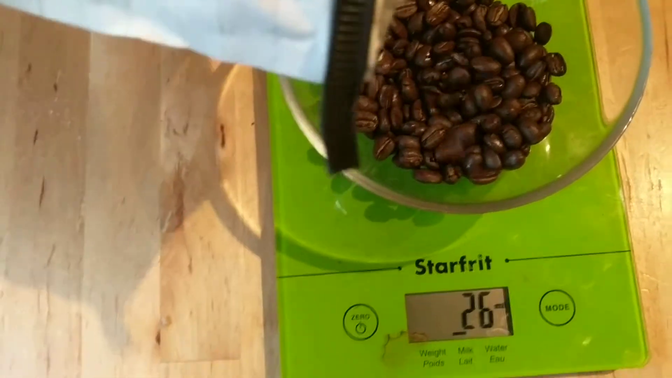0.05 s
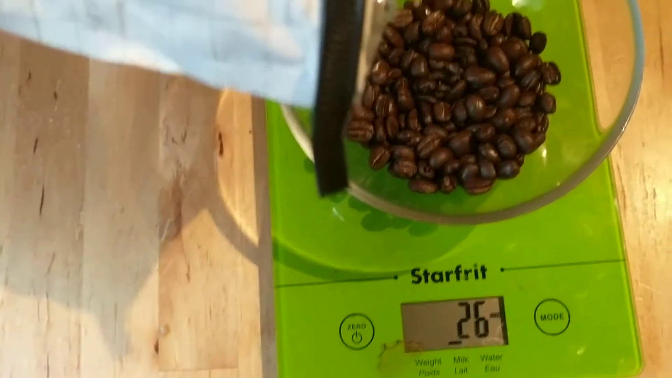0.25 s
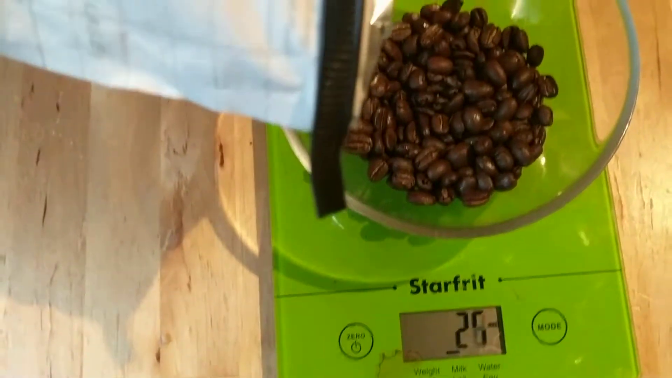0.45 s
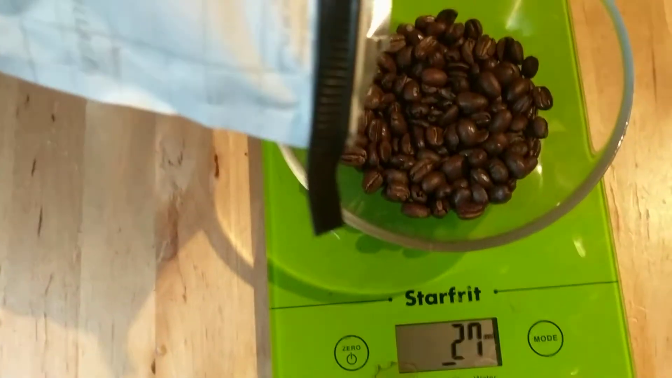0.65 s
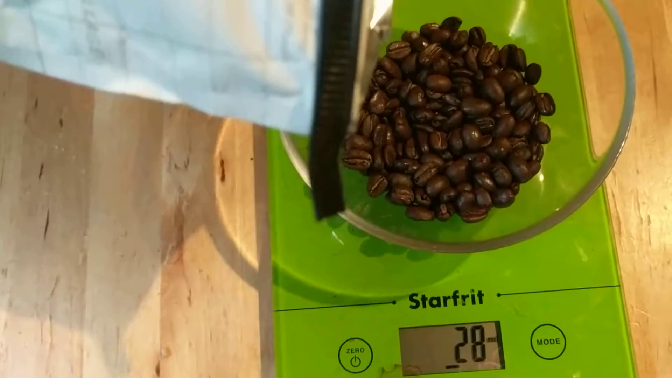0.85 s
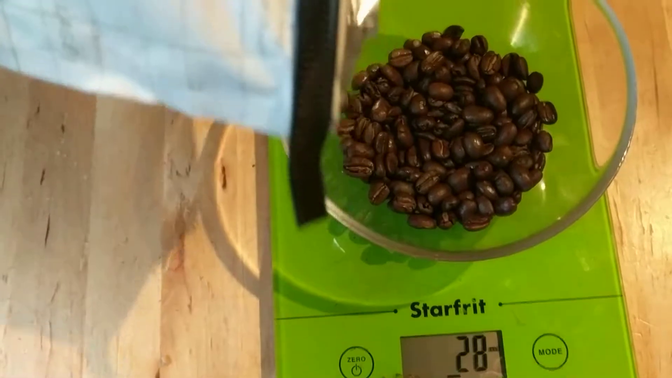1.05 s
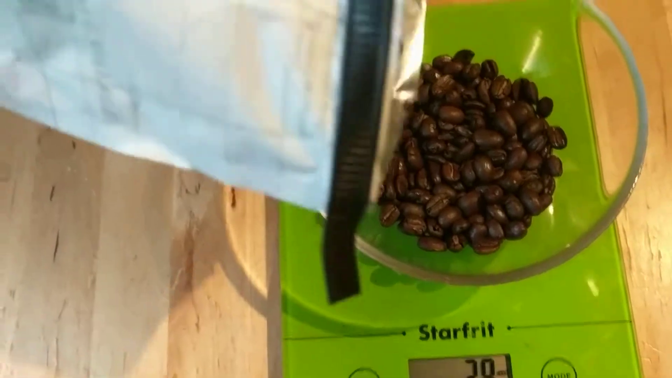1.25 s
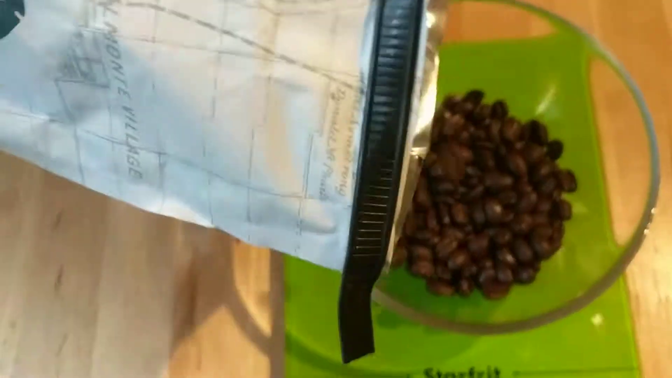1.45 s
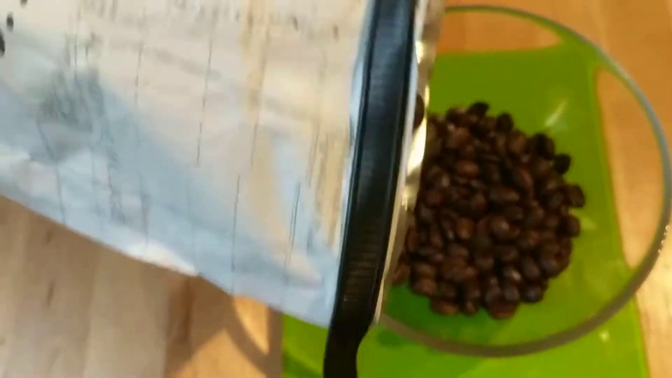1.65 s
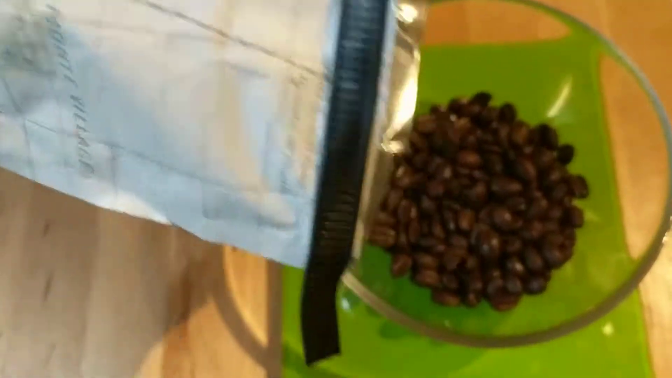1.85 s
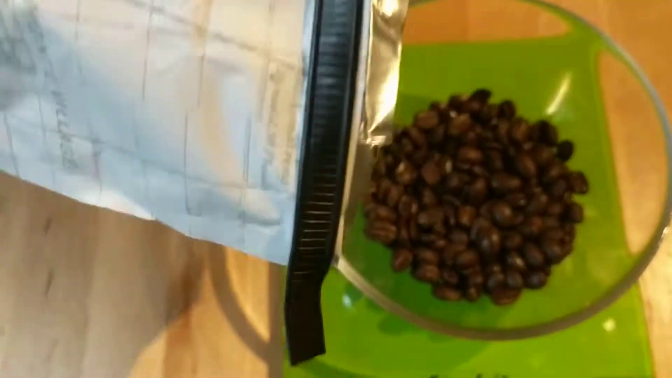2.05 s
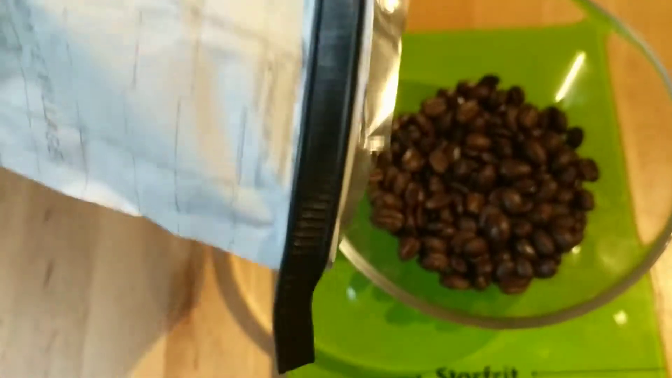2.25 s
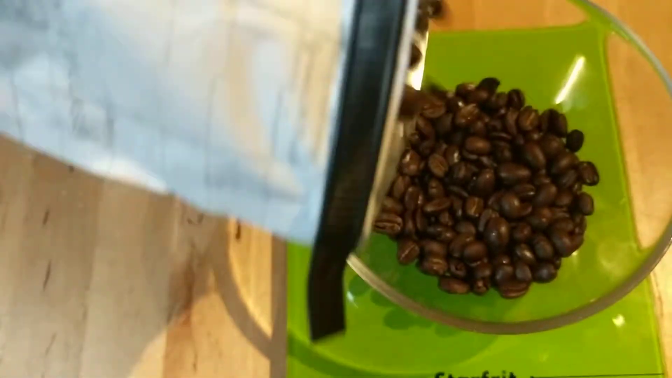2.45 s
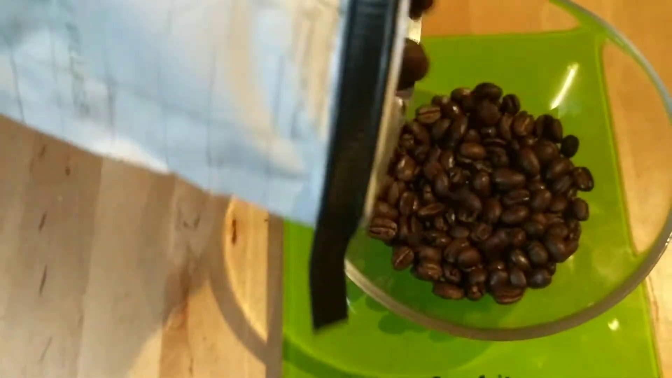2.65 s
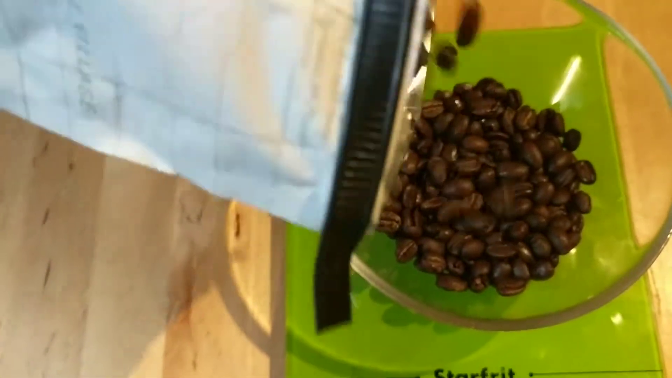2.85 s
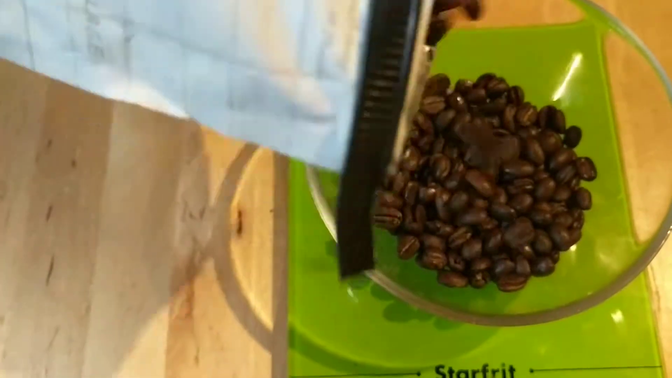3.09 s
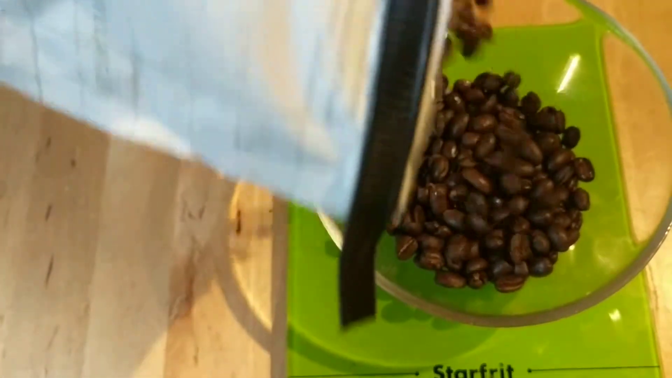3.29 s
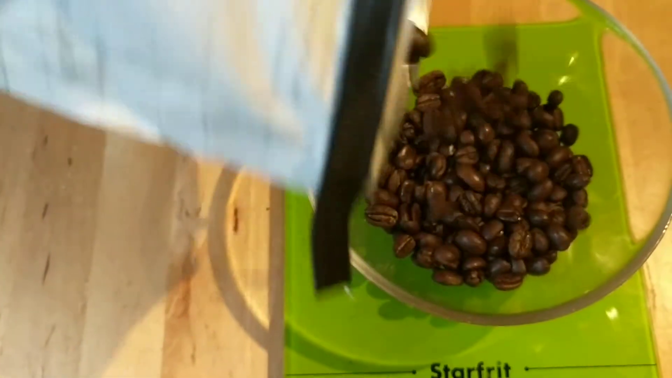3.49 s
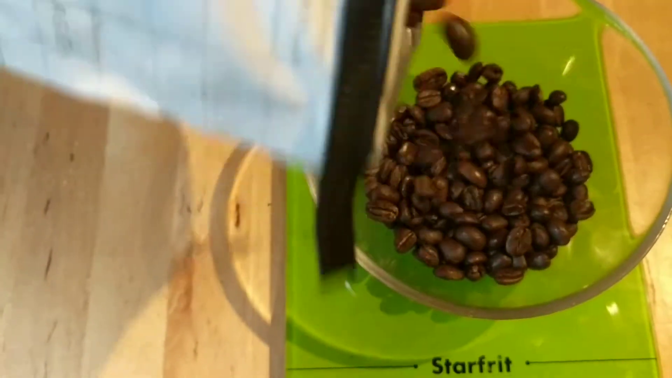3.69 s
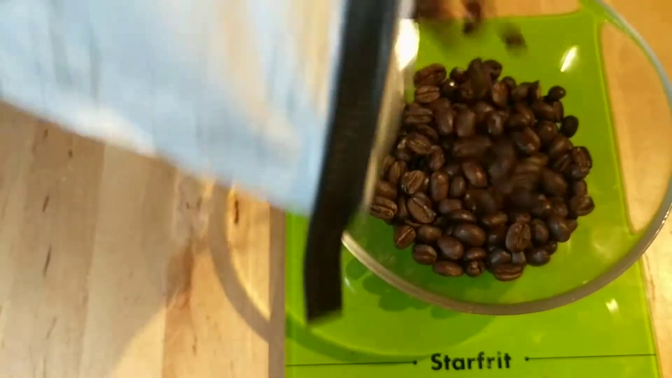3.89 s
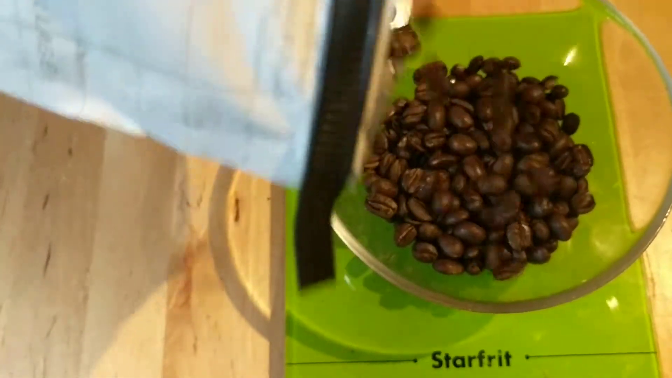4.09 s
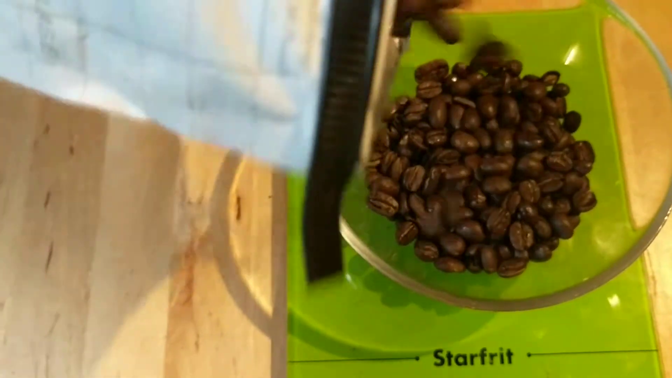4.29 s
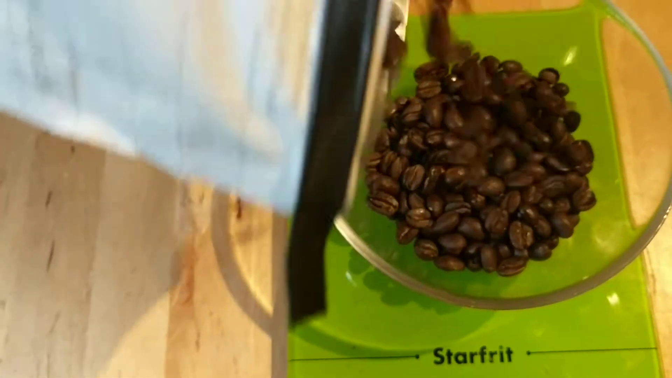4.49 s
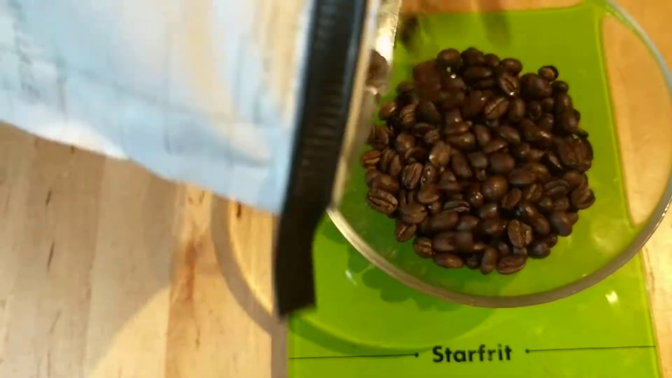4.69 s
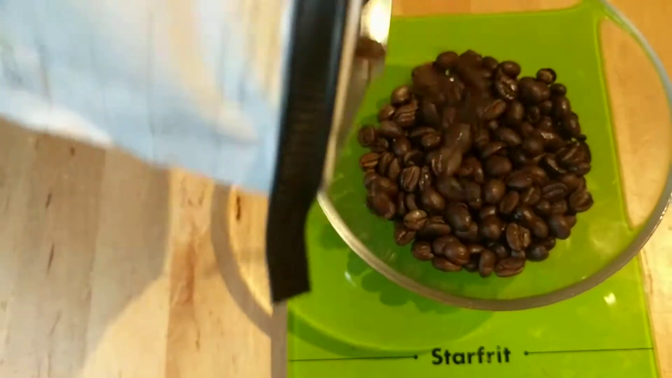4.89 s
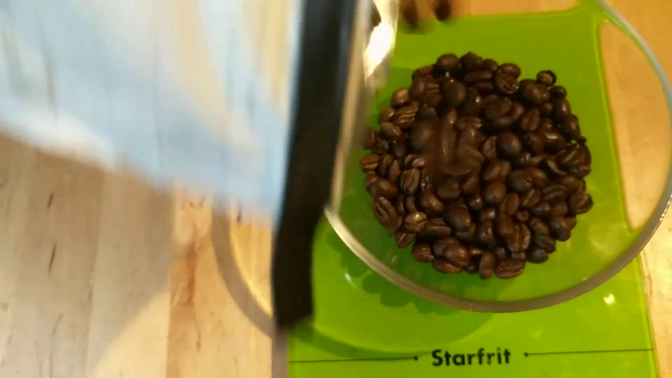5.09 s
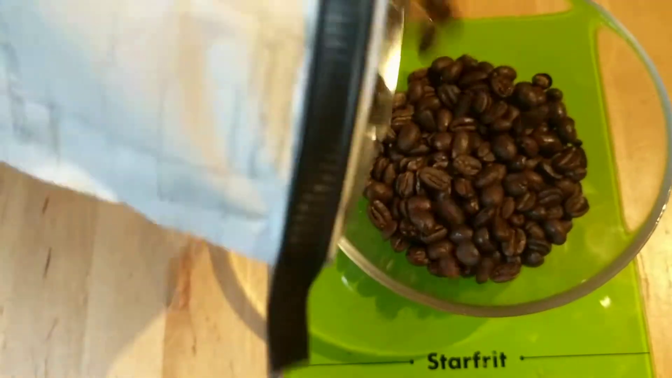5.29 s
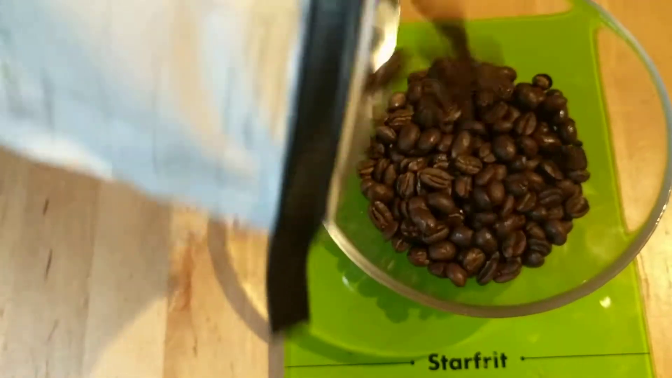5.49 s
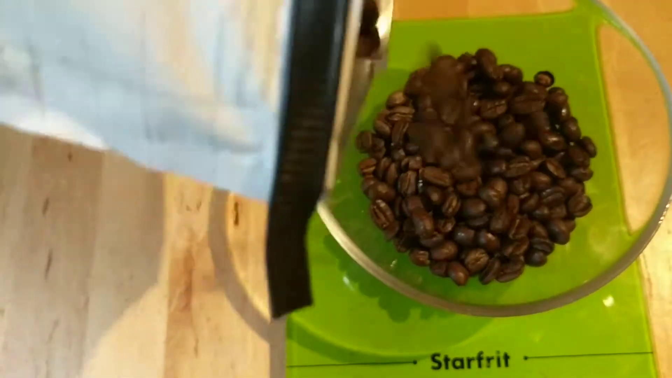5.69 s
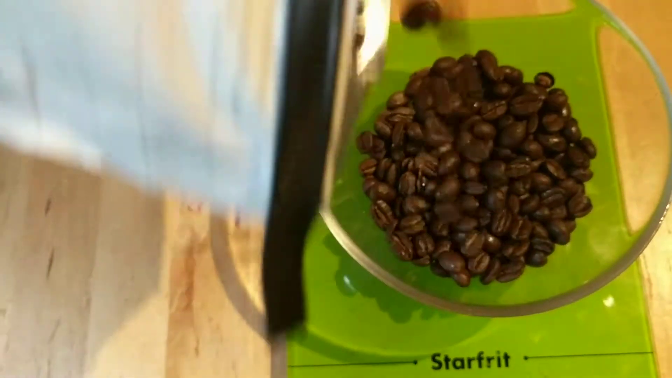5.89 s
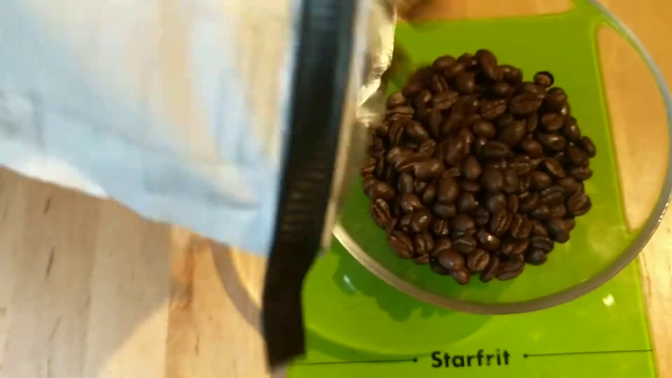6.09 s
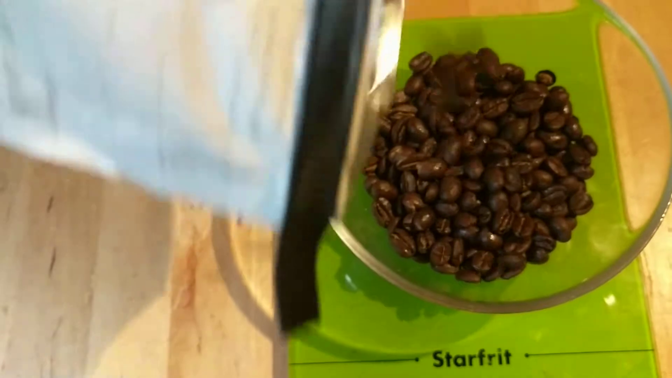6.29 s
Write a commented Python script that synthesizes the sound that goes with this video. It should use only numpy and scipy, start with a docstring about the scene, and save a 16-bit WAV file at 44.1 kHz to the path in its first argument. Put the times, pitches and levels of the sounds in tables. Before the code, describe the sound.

A close, dry view of coffee beans shaken from a foil-lined bag onto a heap in a glass bowl, in a quiet kitchen with faint air, low wavering hum and a barely audible high pulsing whine. In the first 0.3 s a few beans click down with a small bag rattle. Then it is nearly still until about 1.4 s, when beans creep and slide in the bag; scattered clicks and papery knocks come from 1.5 to 2 s. The dull rattle swells around 2.3 s, and from 2.6 s the pour sets in, full by 3.4 s: sharp bright clicks with hollow knocks, tiny rebounds, and surges of pattering clumps over hollow bag rustling. Faint glass pings occur near 0.1, 3.6, 4.1 and 6.3 s, and a soft low bump at 4.8 s. The uneven pouring continues to the end, about 6.3 s.

```python
"""Roasted coffee beans are shaken out of a foil-lined bag onto a heap in a glass bowl, close by.
Random contacts of sliding beans excite the folds and cavity of the bag: a dull papery rattle.
Each falling bean is a pair of filtered impulses, a brittle click and a hollow knock, and the heap patters.
Damped sines ring the bare glass and make one soft bump; room reflections follow all the beans.
Filtered noise gives the kitchen's air and low hum, and pulsed sines a faint electronic whine."""
import sys
import numpy as np
from scipy import signal
from scipy.fft import rfft, irfft
from scipy.io import wavfile

SR = 44100
rng = np.random.default_rng(int(sys.argv[2]) if len(sys.argv) > 2 else 0)


def to_wav(sig):
    """Store sig (one row per channel, or 1-D mono) as 16-bit WAV at the path in sys.argv[1].

    Samples outside -1..1 are clipped; the rate is SR.
    """
    pcm = np.clip(np.atleast_2d(sig), -1, 1) * 32767
    pcm = np.round(pcm).astype(np.int16)
    wavfile.write(sys.argv[1], SR, pcm.T)  # frames by channels


N = 279584
T = np.arange(N) / SR
POUR_S, POUR_BUILD_S = 2.62, 0.76  # start of the steady pour and the time it takes to build up


def undb(db):
    """Level definition: converts decibels to amplitude gain."""
    return 10 ** (np.asarray(db) / 20)


def unit(x):
    """Normalisation by mean power: scales to rms 1."""
    return x / np.sqrt(np.mean(x ** 2))


def follow(curve):
    """Amplitude envelope: the gain along a (t/s, level/dB) curve, interpolated in decibels."""
    return undb(np.interp(T, *np.transpose(curve)))


def add(out, s, sound):
    """Linear superposition: mixes a sound in at time s."""
    i = int(np.clip(s * SR, 0, N))
    out[i:i + len(sound)] += sound[:N - i]


def response(colour, size=1024):
    """Minimum phase: folding the cepstrum gives a causal impulse response with a (f/Hz, level/dB) spectrum."""
    hz, db = np.transpose(colour)
    bins = np.maximum(np.arange(size // 2 + 1) * SR / size, 1)
    log_gain = np.log(undb(np.interp(np.log(bins), np.log(hz), db)))
    cepstrum = irfft(log_gain)
    cepstrum[1:size // 2] *= 2
    cepstrum[size // 2 + 1:] = 0
    return irfft(np.exp(rfft(cepstrum)))


def through(x, ir):
    """Convolution: the output of a linear system with this impulse response."""
    return signal.oaconvolve(x, ir)[:len(x)]


def resonate(x, hz, width_hz):
    """Simple resonance: one second-order mode with gain 1 at its centre."""
    b, a = signal.iirpeak(min(hz, SR * .45), hz / width_hz, SR)
    return signal.lfilter(b, a, x + 1e-18)


def fade(t60, size):
    """Exponential damping: amplitude falls by 60 dB in t60 seconds."""
    return np.exp(-np.log(1000) * T[:size] / t60)


def blow(x, db):
    """Energy of a transient: scales x to the energy of 4 ms at this rms level."""
    return x * undb(db) * np.sqrt(.004 * SR / np.sum(x ** 2))


def contacts(per_s, spread_db, size=4096):
    """Poisson process: random tiny impacts, many weak and a few strong, of either sign."""
    gap, strength, sign = rng.random((size, 3)).T
    at = (np.cumsum(-np.log(1 - gap)) * SR / per_s).astype(int)
    excess_db = spread_db * np.minimum(-np.log(1 - strength), np.pi)
    hits = np.sign(sign - .5) * undb(excess_db)
    return unit(np.bincount(at[at < N], hits[at < N], N))


def rustle(hits, t60):
    """Modulated noise: each contact leaves a brief noisy shiver whose power decays exponentially."""
    keep = np.exp(-np.log(1000) / (t60 * SR))
    power = signal.lfilter([1], [1, -keep], hits ** 2 + 1e-18)
    return unit(np.sqrt(power) * rng.standard_normal(N))


def snap(t60, grit, size=1024):
    """Impulsive excitation: one hard contact and a very short noisy shudder of the shell."""
    x = grit * rng.standard_normal(size) * fade(t60, size)
    x[0] += 1
    return x


def surges(rows, spill_share=0.52, settle_share=0.76):
    """Incoherent addition: masses of beans gather speed, then come to rest; their powers add."""
    power = np.zeros(N)
    for s, db, length in rows:
        near = slice(*np.searchsorted(T, [s - 2 * length, s + 6 * length]))
        age = (T[near] - s) / length
        # Gaussian rise before the peak, exponential fall after it
        loss = np.where(age < 0, (age / spill_share) ** 2, age / settle_share)
        power[near] += undb(db) ** 2 * np.exp(-2 * loss)
    return np.sqrt(power)


def muffled(x, edge_hz=4800, deep_db=-5, leaves_s=2.7, arrives_s=3.2):
    """High-frequency absorption: beans deep in the bag sound duller until they reach its mouth."""
    low = signal.sosfiltfilt(signal.butter(2, edge_hz, fs=SR, output="sos"), x)
    return low + (x - low) * undb(np.interp(T, [leaves_s, arrives_s], [deep_db, 0]))


# beans creeping along the bag between slides, more as it tips, before the cavity: (t/s, level/dB)
CREEP = [(0, -46.5), (.2, -80), (1.05, -93), (1.27, -78), (1.4, -63), (1.55, -60), (1.85, -65), (1.95, -64),
         (2.08, -55), (2.5, -47), (3.4, -40.5), (3.65, -51), (4.15, -50), (4.5, -47), (5.13, -53.5),
         (5.6, -48), (6, -56), (6.34, -46)]
# slides of beans down the shaken bag, before the cavity: (t/s at the peak, level/dB, length/s)
SLIDES = [(.035, -46.5, 0.059), (1.11, -72, 0.034), (1.31, -64.5, 0.04), (1.475, -47, 0.072),
          (1.65, -53.5, 0.1), (1.77, -49, 0.12), (2.05, -44.5, 0.041), (2.19, -46.5, 0.077),
          (2.28, -51, 0.029), (2.34, -42.5, 0.036), (2.49, -36.5, 0.11), (2.66, -36, .07),
          (2.79, -39.5, 0.063), (2.95, -36.5, 0.044), (3.08, -40, 0.096), (3.19, -36, .07),
          (3.245, -29, 0.041), (3.38, -39, 0.14), (3.56, -41.5, 0.057), (3.72, -38.5, 0.063),
          (3.85, -33, 0.1), (3.95, -37.5, 0.11), (4.02, -35.5, .06), (4.31, -32, 0.059), (4.45, -32, 0.11),
          (4.62, -41.5, 0.053), (4.81, -41.5, 0.095), (4.94, -40.5, 0.063), (5.08, -44, 0.07),
          (5.24, -37, .08), (5.35, -37, 0.082), (5.405, -31.5, 0.058), (5.55, -33, .15), (5.72, -38.5, 0.2),
          (5.89, -38, 0.044), (6.045, -41.5, 0.038), (6.135, -39.5, .04), (6.22, -34.5, 0.073),
          (6.31, -38.5, 0.052)]
# single beans knocking on the bag wall: (t/s, level/dB over 4 ms before the cavity,
# f/Hz of the struck fold)
BAG_KNOCKS = [(.031, -61, 2420), (.07, -43, 1930), (.38, -69, 1550), (0.707, -69.5, 1900),
              (1.097, -67, 1400), (1.155, -66, 3900), (1.34, -53, 3520), (1.366, -51.5, 2960),
              (1.631, -43, 3800), (1.642, -32.5, 3600), (1.648, -40.5, 583), (1.785, -48.5, 710),
              (2.019, -45, 2980), (2.431, -34.5, 3600), (2.45, -53, 2240), (2.846, -33.5, 1170),
              (3.2434, -30, 1303), (3.631, -45, 3150), (3.851, -31.5, 1000), (3.945, -34, 1480),
              (4.022, -33.5, 1360), (4.234, -42.5, 2340), (4.935, -33, 2530), (5.153, -42.5, 2230),
              (5.398, -33, 2270)]
# spectrum of the limp bag wall: (f/Hz, level/dB)
BAG_WALL = [(30, -38), (60, -22.5), (150, -9), (210, -9), (290, -5.5), (410, -6.5), (570, -8), (760, -3.5),
            (1450, -1.5), (1950, -7), (2400, -6), (3100, -8), (4000, -8.5), (4900, -10.5), (8000, -15),
            (16000, -24.5)]
# resonances of the bag's cavity: (f/Hz, width/Hz, level/dB)
BAG_CAVITY = [(760, 53, -4.5), (2328, 240, -4), (3500, 91, -12)]


def bag(shiver_db=-6, fold_db=8, fold_q=7, knock_fold_db=14, knock_fold_q=6, clack_db=-19):
    """Forced vibration: tumbling beans drum on folds of many pitches and clack; the cavity resonates."""
    motion = np.hypot(follow(CREEP), surges(SLIDES))
    wall, drumming = response(BAG_WALL), 0
    for hz in np.geomspace(550, 4000, num=10):
        hits = contacts(per_s=85, spread_db=2.0)
        hits = hits + undb(shiver_db) * rustle(hits, t60=0.044)
        drumming = drumming + hits + undb(fold_db) * resonate(hits, hz, hz / fold_q)
    drumming = muffled(unit(through(drumming, wall)))
    clacks = unit(through(contacts(per_s=130, spread_db=12.5), response(BEAN_CLICK)))
    out = (drumming + undb(clack_db) * clacks) * motion
    for s, db, hz in BAG_KNOCKS:
        knock = through(snap(t60=0.012, grit=0.3), wall)
        fold = undb(knock_fold_db) * resonate(knock, hz, hz / knock_fold_q)
        add(out, s, blow(knock + fold, db))
    cavity = sum(undb(db) * resonate(out, hz, width) for hz, width, db in BAG_CAVITY)
    return out + cavity


# spectrum of the still room air: (f/Hz, level/dB)
ROOM_AIR = [(20, -27.5), (35, -8), (60, -14), (130, -14.5), (200, -21), (330, -25), (860, -32.5),
            (2000, -39.5), (5700, -42.5), (10000, -47.5), (16000, -48.5)]


def kitchen(air_db=-66, hum_hz=55, hum_db=-68):
    """Filtered noise: still room air, and a narrow band whose beating makes a low hum waver."""
    air, hum = rng.standard_normal((2, N))
    air = unit(through(air, response(ROOM_AIR, size=8192)))
    hum = unit(resonate(resonate(hum, hum_hz, 5.1), hum_hz, 10))
    return undb(air_db) * air + undb(hum_db) * hum


def whine(hz=5812, level_db=-88, octave_db=5, pulse_hz=30):
    """Amplitude modulation: a faint electronic whine and its stronger octave pulse on and off."""
    gate = np.clip(.5 + 2 * np.sin(2 * np.pi * pulse_hz * T), 0, 1)
    jitter = 0.0117 * np.cumsum(rng.standard_normal(N))
    phase = 2 * np.pi * hz * T + jitter
    return undb(level_db) * gate * (np.sin(phase) + undb(octave_db) * np.sin(2 * phase))


def stray_beans(level_db=-39, spread_db=2, knock_db=-4, knock_spread_db=3, count=22):
    """Stratified random arrivals: soft beans drop all through the pour, one in each equal interval."""
    when = POUR_S + (np.arange(count) + rng.random(count)) / count * (T[-1] - POUR_S)
    size, knock = rng.standard_normal((count, 2)).T
    return list(zip(when, level_db + spread_db * size, knock_db + knock_spread_db * knock))


# single beans landing, loud and soft: (t/s, level/dB of the brittle click over 4 ms,
# level/dB of the hollow knock relative to the click)
BEANS = [(0.0883, -21.5, -21), (.1316, -30, -13), (0.1782, -41.5, -19), (0.2427, -52.5, 2),
         (0.251, -30.5, -4.5), (.2677, -45, -7), (1.4981, -48.5, -10), (1.606, -35, -7), (1.612, -43, 1),
         (1.643, -41, -13), (1.7135, -28.5, -3), (1.7372, -46, 1.5), (1.777, -51, 8.5), (1.8658, -35, -5),
         (1.873, -39.5, -3), (1.99, -29, -17), (1.992, -28.5, -8.5), (2.6312, -31.5, -5),
         (2.6361, -29.5, -12), (2.6915, -24, -8.5), (2.707, -29, -9), (2.855, -29, -7),
         (2.8725, -22.5, -23), (2.9272, -31.5, -12), (2.933, -31, -3), (2.9933, -28, 0.5),
         (3.0174, -26.5, -23), (3.0655, -28, -13), (3.0746, -29, -3), (3.141, -30, -0.5),
         (3.1903, -28, -11), (3.2763, -24, -19), (3.316, -26, -19), (3.3483, -28.5, -3), (3.3818, -28, -9),
         (3.441, -22, -9), (3.4655, -30, -7), (3.488, -31, -6.5), (3.5124, -28.5, -17),
         (3.5962, -20, -13.5), (3.631, -29.5, -12), (3.673, -31.5, -9), (3.7339, -32.5, -2.5),
         (3.7777, -18.5, -12), (3.8805, -26.5, -3), (3.925, -25.5, -20), (3.969, -26, -24),
         (4.0307, -20.5, -11), (4.0562, -27.5, -11), (4.1017, -28.5, -9.5), (4.128, -27.5, -18),
         (4.195, -34.5, -5), (4.214, -29, -21), (4.411, -24, -21), (4.4535, -25, -20), (4.507, -24.5, -12),
         (4.6313, -27.5, -11), (4.6484, -25.5, -16), (4.673, -26, -22), (4.815, -30, -2.5),
         (4.833, -20.5, -17), (4.865, -32, -13), (4.8845, -30.5, -9), (4.971, -28.5, -14),
         (4.9799, -19.5, -17), (4.997, -31, -7), (5.02, -36, -10), (5.1504, -29, -35), (5.198, -30, -20),
         (5.229, -25, -19), (5.277, -29.5, -3.5), (5.3046, -23.5, -25), (5.3763, -27, -20),
         (5.443, -27, -7), (5.4632, -28, -17), (5.5132, -32, -4), (5.58, -31, -1.5), (5.602, -33, -7),
         (5.62, -23.5, -21), (5.658, -27.5, -26), (5.7435, -24, -28), (5.8194, -32.5, -3.5),
         (5.9396, -29, -14), (5.9446, -23.5, -35), (5.9595, -25, -11), (5.9943, -28.5, -32.5),
         (6.035, -27.5, -11), (6.058, -25, -14), (6.0869, -27, -10.5), (6.2864, -30, -7),
         (6.3034, -28.5, -23)]
# spectrum of the brittle click of a bean: (f/Hz, level/dB)
BEAN_CLICK = [(500, -18.5), (3000, -23), (6000, -12.5), (8600, -9), (10400, -6.5), (11500, -4),
              (13200, -2.5), (15500, -3), (17000, -21.5)]
# spectrum of the hollow knock of a bean: (f/Hz, level/dB)
BEAN_KNOCK = [(100, -32.5), (350, -25), (600, -5), (1100, -10.5), (3500, 2), (5500, 0), (8000, 3.5),
              (14000, -46)]


def falling_beans(husk_hz=13000, husk_octaves_per_db=0.01, husk_spread=0.15, husk_width_hz=900, husk_db=8,
                  usual_knock_db=-13, rebound_db=-9, brush_db=-13, hop_db=-18):
    """Impact and rebound: each bean clicks and knocks, the hollower the lower, then rebounds and hops."""
    out, bright, hollow = np.zeros(N), response(BEAN_CLICK), response(BEAN_KNOCK)
    for s, db, knock_db in BEANS + stray_beans():
        octaves = husk_octaves_per_db * (usual_knock_db - knock_db)
        octaves = octaves + husk_spread * (2 * rng.random() - 1)
        click = through(snap(t60=0.0028, grit=0.3), bright)
        click = click + undb(husk_db) * resonate(click, husk_hz * 2 ** octaves, husk_width_hz)
        knock = through(snap(t60=0.0046, grit=0.2), hollow)
        bean = blow(click, db) + blow(knock, db + knock_db)
        add(out, s, bean)
        add(out, s + rng.uniform(0.000546, 0.00336), undb(rebound_db) * bean)
        # a faint bright brush of noise leads into each click
        brush = through(rng.standard_normal(130) * np.hanning(130), bright)
        add(out, s - len(brush) / SR, blow(brush, db + brush_db + 3 * rng.standard_normal()))
        # the bean then hops and lands again, much more softly
        add(out, s + rng.uniform(0.006, 0.011), undb(hop_db + 2 * rng.standard_normal()) * bean)
    return out


def pouring():
    """Flow envelope: beans leave the bag, their power growing linearly; amplitude 0 to 1."""
    return np.sqrt(np.clip((T - POUR_S) / POUR_BUILD_S, 0, 1))


# clumps of beans that spill onto the heap together: (t/s at the peak, level/dB before clump_db, length/s)
CLUMPS = [(2.69, -33, 0.029), (3.08, -30.5, 0.022), (3.305, -30, .05), (3.5, -36, 0.067),
          (3.96, -29, 0.035), (4.2, -36, 0.033), (4.31, -33.5, 0.036), (4.44, -38, 0.054),
          (4.525, -30, 0.055), (4.65, -34, 0.058), (4.73, -34.5, 0.029), (4.87, -36, 0.061),
          (5.07, -37, 0.029), (5.64, -28, 0.049), (5.75, -32, 0.031), (5.86, -34, 0.064), (6.3, -41, 0.038)]


def heap(clump_db=-1, trickle_db=-52, jostle_db=-21, jostle_t60=.11, scrape_db=-7, size=8192):
    """Granular impacts: small and large beans click at different pitches under flow, clumps and beans."""
    ticks, jostled = 0, np.zeros(N)
    for hz in (10400, 12000, 13300, 15000):
        hits = contacts(per_s=100, spread_db=7.5)
        hits = hits + undb(scrape_db) * rustle(hits, t60=0.0059)
        ticks = ticks + hits + 0.49 * resonate(hits, hz, 1000)
    # power of the stir that each bean of the table sets off
    for s, db, _ in BEANS:
        add(jostled, s, (undb(db + jostle_db) * fade(jostle_t60, size)) ** 2)
    clumps = undb(clump_db) * surges(CLUMPS)
    trickle = undb(trickle_db) * pouring()
    motion = np.sqrt(jostled + clumps ** 2 + trickle ** 2)
    return unit(through(ticks, response(BEAN_CLICK))) * motion


# beans that hit the bare glass: (t/s, level/dB applied to the whole ring)
GLASS_HITS = [(0.125, -51), (3.597, -46), (4.074, -48), (6.286, -40.5)]
# modes of the glass bowl: (f/Hz, relative level/dB, t60/s)
BOWL_MODES = [(2290, -9, .09), (4050, -7, .12), (6205, 0, .17), (8317, -10, .12)]


def bowl(beans, through_heap_db=-56, size=16384):
    """Modal superposition: the glass rings when struck directly, and faintly through the heap."""
    ring = sum(undb(db) * np.sin(2 * np.pi * hz * T[:size]) * fade(t60, size) for hz, db, t60 in BOWL_MODES)
    out = undb(through_heap_db) * through(beans, ring)
    for s, db in GLASS_HITS:
        add(out, s, undb(db) * ring)
    return out


def bump(s=4.833, hz=62, t60=0.068, thud_db=-28, push_db=-23, push_s=0.00058, size=8192):
    """Damped oscillation: a soft bump gives a brief push, then a low, quickly damped wobble."""
    out, t = np.zeros(N), T[:size]
    add(out, s, -undb(push_db) * t / push_s * np.exp(1 - t / push_s))
    add(out, s + 0.0012, undb(thud_db) * np.sin(2 * np.pi * hz * t) * fade(t60, size))
    return out


def room(x, near_db=-13, near_t60=0.012, far_db=-17, far_t60=0.068, size=16384):
    """Reverberation: quick reflections from bowl and counter, then the short tail of the kitchen."""
    near = rng.standard_normal(size) * fade(near_t60, size) * (T[:size] > .001)
    far = rng.standard_normal(size) * fade(far_t60, size) * (T[:size] > .006)
    near = undb(near_db) * near / np.linalg.norm(near)
    far = undb(far_db) * far / np.linalg.norm(far)
    return x + through(x, near + far)


def scene():
    """Superposition of sources: bag, beans and bowl reverberate; bump, kitchen and whine are added dry."""
    beans = falling_beans() + heap()
    poured = room(beans + bag() + bowl(beans))
    return (poured + bump() + kitchen() + whine())[None]


def record(dry, bass_hz=29, top_hz=16000):
    """Band limitation: a high-pass cuts the deepest bass and a steep low-pass the top."""
    dry = signal.sosfilt(signal.butter(8, bass_hz, "high", fs=SR, output="sos"), dry)
    return signal.sosfilt(signal.ellip(8, .2, 70, top_hz, fs=SR, output="sos"), dry)


dry = scene()
out = record(dry)
to_wav(out)
```